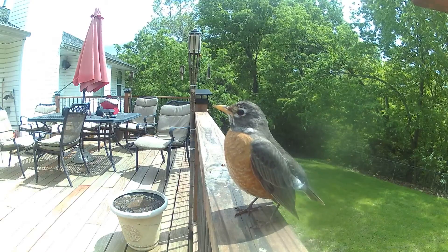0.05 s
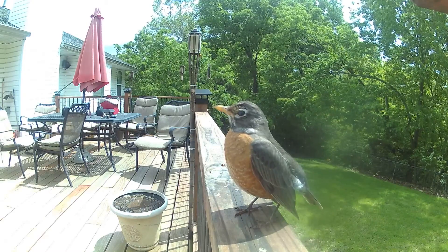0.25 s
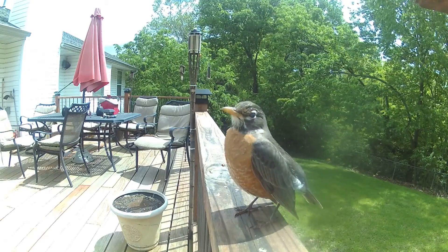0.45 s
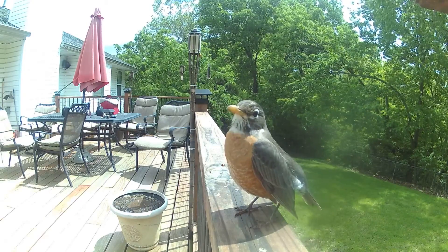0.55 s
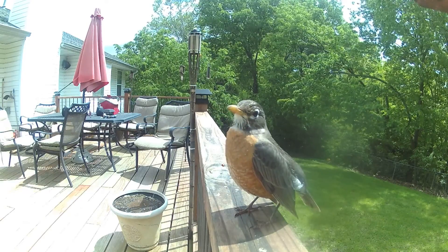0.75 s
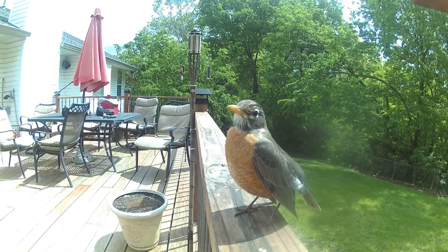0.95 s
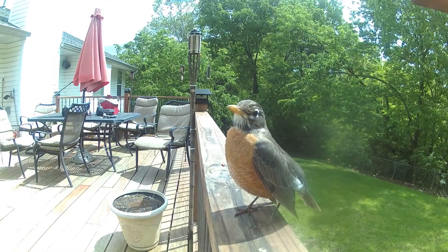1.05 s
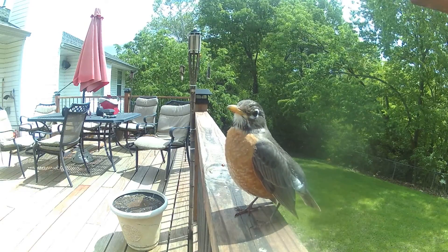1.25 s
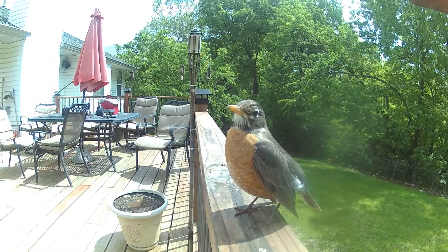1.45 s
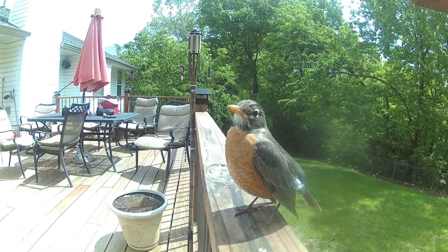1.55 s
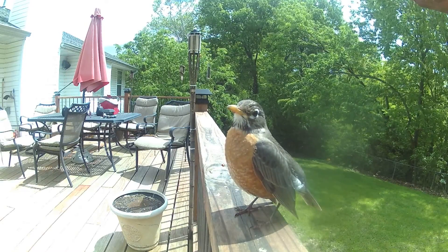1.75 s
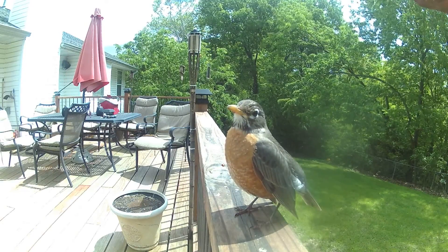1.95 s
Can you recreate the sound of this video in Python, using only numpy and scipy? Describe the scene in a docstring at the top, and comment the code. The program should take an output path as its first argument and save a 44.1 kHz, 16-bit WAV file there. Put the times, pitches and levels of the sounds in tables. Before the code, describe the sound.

Three quick, mellow robin chucks near a small outdoor microphone, with distant hum and soft hiss

```python
"""A deck rail outdoors, where a robin gives three soft chucks close to a small camera.
Both sides of its voice box whistle at once, as swept sines with difference and sum tones, breath and a faint rasp.
Boards and wall scatter short echoes. A distant machine hums as wavering sines, the camera's electronics whine
faintly as fixed sines, and shaped noise gives the leaves, the microphone's hiss and the wind's low rumble on it."""
import sys
import numpy as np
from scipy import signal
from scipy.fft import rfft, irfft
from scipy.io import wavfile
from scipy.ndimage import uniform_filter1d

SR = 44100
rng = np.random.default_rng(int(sys.argv[2]) if len(sys.argv) > 2 else 0)


def unload_audio(sound):
    """Save the sound as a 16-bit wav file, at the path given as the first command line argument."""
    columns = np.transpose(np.atleast_2d(sound))
    # keep every value between -1 and 1, then stretch to whole-number steps
    steps = np.round(np.clip(columns, -1, 1) * 32767)
    wavfile.write(sys.argv[1], SR, steps.astype(np.int16))


def amplitude_ratio(level_db):
    """Convert a level in decibels to the matching linear amplitude (field) ratio."""
    exponent = np.asarray(level_db, float) / 20
    return 10 ** exponent


N = 88200  # samples, two seconds

FADE_S = 0.002  # note edges, and rounding of the note curves


def smooth(curve):
    """Rounds the corners of a control curve with a running mean."""
    return uniform_filter1d(curve, int(FADE_S * SR))


def band(x, hz, width_hz):
    """Band-pass centred on hz."""
    edges = [hz - width_hz / 2, hz + width_hz / 2]
    return signal.sosfilt(signal.butter(2, edges, "band", fs=SR, output="sos"), x)


def walk(rate_hz):
    """Slow random wander with a spread near 1: held random levels, slewed twice."""
    hold = int(SR / rate_hz)
    steps = np.repeat(rng.standard_normal(N // hold + 2), hold)
    return 1.37 * uniform_filter1d(uniform_filter1d(steps, hold), hold)[:N]


def colour(points):
    """Noise of rms 1 whose spectrum runs through (Hz, dB) points on a log frequency axis."""
    points = np.array(points)
    hz = np.maximum(np.arange(N // 2 + 1) * SR / N, 1)
    gain_db = np.interp(np.log(hz), np.log(points[:, 0]), points[:, 1])
    noise = irfft(rfft(rng.standard_normal(N)) * amplitude_ratio(gain_db), N)
    return noise / np.std(noise)


def voice(notes, t, level_column=2):
    """Phase and amplitude of one side of the voice box, gliding through its notes and shut between them."""
    rows = np.concatenate([np.array(note) for note in notes])
    gate = sum(np.clip(np.minimum(t - note[0][0], note[-1][0] - t) / FADE_S, 0, 1) for note in notes)
    pitch_hz = smooth(np.interp(t, rows[:, 0], rows[:, 1]))
    level_db = smooth(np.interp(t, rows[:, 0], rows[:, level_column]))
    return 2 * np.pi * np.cumsum(pitch_hz) / SR, np.sqrt(2) * gate * amplitude_ratio(level_db)


# Upper side of the voice box, one list per note. Each row: time in seconds, pitch in Hz, level in dB.
UPPER_NOTES = [
    [(0.236, 1998, -72.6), (0.24, 2416, -48.3), (0.245, 2822, -47.8), (0.25, 2960, -47.4),
     (0.255, 2948, -46.5), (0.26, 2871, -45.4), (0.265, 2777, -44.2), (0.27, 2698, -44.6),
     (0.275, 2536, -45.7), (0.28, 2079, -37.5), (0.285, 1749, -35.2), (0.29, 1524, -35.5),
     (0.295, 1361, -33.3), (0.3, 1354, -35.3), (0.305, 1390, -42.6), (0.31, 1345, -70.9)],
    [(0.478, 2202, -73.5), (0.481, 2414, -53.8), (0.485, 2745, -47.8), (0.49, 3035, -48.4),
     (0.495, 3064, -48.1), (0.5, 2958, -46.4), (0.505, 2823, -44.1), (0.51, 2657, -42.9),
     (0.515, 2578, -41.9), (0.52, 2270, -42.0), (0.525, 1982, -41.6), (0.53, 1653, -37.1),
     (0.535, 1483, -35.3), (0.54, 1386, -34.4), (0.546, 1489, -38.8), (0.55, 1339, -48.3),
     (0.554, 1438, -72.2)],
    [(0.708, 2090, -72.6), (0.711, 2282, -54.0), (0.715, 2718, -49.7), (0.72, 3110, -51.6),
     (0.725, 3212, -51.7), (0.735, 3192, -52.1), (0.745, 3065, -48.3), (0.75, 3026, -47.5),
     (0.756, 3115, -49.5), (0.76, 3028, -46.3), (0.765, 2843, -43.0), (0.77, 2524, -40.1),
     (0.775, 2250, -45.9), (0.779, 2010, -69.7)],
    [(0.788, 1966, -68.9), (0.791, 1769, -49.0), (0.794, 1538, -43.3), (0.797, 1439, -40.5),
     (0.801, 1479, -43.6), (0.805, 1445, -49.5), (0.809, 1443, -58.7)],
]
# Lower side, one list per note. Each row: time in seconds, pitch in Hz, level in dB,
# level of the difference tone in dB.
LOWER_NOTES = [
    [(0.237, 1164, -56.6, -59.7), (0.24, 1512, -43.9, -51.7), (0.244, 1762, -40.5, -46.9),
     (0.25, 1740, -36.8, -41.8), (0.255, 1704, -35.7, -41.6), (0.26, 1643, -35.4, -43.3),
     (0.265, 1581, -35.3, -40.8), (0.27, 1493, -31.1, -38.5), (0.275, 1294, -27.3, -38),
     (0.278, 1191, -31.0, -38), (0.281, 1169, -38.5, -47.9), (0.285, 1273, -48.5, -76.6)],
    [(0.478, 1184, -59.8, -66.9), (0.481, 1545, -44.2, -60.4), (0.485, 1778, -39.9, -47.2),
     (0.49, 1855, -37.2, -43.4), (0.495, 1830, -34.7, -41.5), (0.505, 1731, -33.0, -40.3),
     (0.515, 1566, -31.6, -44.1), (0.52, 1476, -28.3, -48.4), (0.525, 1330, -25.6, -60.0),
     (0.528, 1220, -28.8, -63.9), (0.531, 1061, -41.2, -71.5), (0.534, 860, -49.4, -68.2)],
    [(0.711, 1797, -72.0, -79.1), (0.715, 1932, -45.5, -55.2), (0.72, 2064, -40.2, -44.8),
     (0.725, 2043, -37.5, -44.6), (0.73, 1982, -34.9, -46.1), (0.735, 1925, -34.4, -44.5),
     (0.745, 1891, -35.2, -43.3), (0.75, 1861, -35.8, -40.7), (0.753, 1796, -38.5, -40.8),
     (0.756, 1549, -41.9, -41.1), (0.76, 1402, -61.8, -70.5)],
]


def both_voices(t):
    """Phase and amplitude of the two whistles, and the amplitude of their difference tone."""
    upper_phase, upper_amp = voice(UPPER_NOTES, t)
    lower_phase, lower_amp = voice(LOWER_NOTES, t)
    difference_amp = voice(LOWER_NOTES, t, level_column=3)[1]
    return upper_phase, upper_amp, lower_phase, lower_amp, difference_amp


# Weaker mixing tones. Each row: multiple of the upper pitch, multiple of the lower pitch, level in dB
# relative to the lower voice (to the upper voice where the lower multiple is 0).
MIXING_TONES = [(0, 2, -27), (1, 1, -31), (2, 0, -29)]


def mixing_tones(upper_phase, upper_amp, lower_phase, lower_amp):
    """Sum tone and octaves of the two whistles, present while the upper sounds, low-passed by the throat."""
    mixes = 0
    for upper_n, lower_n, db in MIXING_TONES:
        carrier = lower_amp if round(lower_n) else upper_amp
        phase = round(upper_n) * upper_phase + round(lower_n) * lower_phase
        mixes = mixes + amplitude_ratio(db) * carrier * (upper_amp > 0) * np.sin(phase)
    throat = signal.butter(8, 3950, fs=SR, output="sos")  # cutoff in Hz
    return signal.sosfiltfilt(throat, mixes)


RASP_HZ = 12300  # centre of the high rasp
# Puffs of breath noise. Each row: start in seconds, length in seconds,
# peak level in dB of the white noise ahead of the bands and their gain.
BREATH_PUFFS = [(.258, .025, -78), (.494, .036, -72)]


def breath(t):
    """High breath noise: half-sine puffs of white noise through a wide and a narrow band."""
    puff = sum(amplitude_ratio(db) * np.sin(np.pi * np.clip((t - start) / length, 0, 1))
               for start, length, db in BREATH_PUFFS)
    air = puff * rng.standard_normal(N)
    return 2 * band(air, RASP_HZ - 1500, 5000) + 2 * band(air, RASP_HZ, 1500)


def rasp_overtone(upper_phase, lower_phase, lower_amp, difference_amp):
    """Faint high overtone while both voices are coupled: the upper pitch plus five times the lower."""
    tone = lower_amp * difference_amp * np.sin(upper_phase + 5 * lower_phase)
    return amplitude_ratio(-3) * band(tone, RASP_HZ, 900)


def robin(t):
    """Two whistles at once, their difference and sum tones, breath noise and a faint high rasp."""
    upper_phase, upper_amp, lower_phase, lower_amp, difference_amp = both_voices(t)
    whistles = upper_amp * np.sin(upper_phase) + lower_amp * np.sin(lower_phase)
    difference = difference_amp * np.sin(upper_phase - lower_phase)
    mixes = mixing_tones(upper_phase, upper_amp, lower_phase, lower_amp)
    rasp = rasp_overtone(upper_phase, lower_phase, lower_amp, difference_amp)
    return whistles + difference + mixes + breath(t) + rasp


def deck_echo(x):
    """Boards and wall scatter the sound: a decaying noise tail of unit energy, mixed in quietly."""
    echo_db, t60_s, first_echo_s = -25, 0.1, 0.003
    t = np.arange(SR // 4) / SR
    tail = rng.standard_normal(len(t)) * amplitude_ratio(-60 * t / t60_s) * (t > first_echo_s)
    tail = tail / np.sqrt(np.sum(tail ** 2))
    return x + amplitude_ratio(echo_db) * signal.fftconvolve(x, tail)[:N]


# Motor tones. Each row: multiple of the blade rate, multiple of the shaft rate, mid level in dB.
MOTOR_TONES = [(0, 5, -60.5), (1, 1, -65), (2, -1, -59.5), (2, 0, -52), (2, 1, -66), (2, 2, -72.5),
               (3, 0, -69), (3, 1, -70.5), (4, -1, -72), (4, 0, -79.5), (4, 1, -66), (5, -1, -69),
               (5, 0, -62.5), (6, -1, -72), (6, 0, -75.5), (7, -2, -79), (7, -1, -80), (7, 1, -67),
               (8, 1, -76), (9, -1, -79), (9, 1, -85.5), (10, -1, -77.5), (10, 1, -86.5), (11, -1, -77),
               (11, 0, -82), (11, 1, -77.5), (12, 0, -88)]
# Hums unrelated to those rates. Each row: mid frequency in Hz, mid level in dB.
OTHER_HUMS = [(422, -72), (447.6, -65), (469.9, -62), (626.6, -73), (1096.6, -75)]


def machine():
    """Steady motor hum: sines at blade and shaft combinations, each wavering a little in pitch and level."""
    blade_hz, shaft_hz = 249.0, 57.9
    waver_db, drift_hz, waver_rate_hz = 1.2, 0.8, 7.0
    tones = [(round(blade) * blade_hz + round(shaft) * shaft_hz, db) for blade, shaft, db in MOTOR_TONES]
    hum = np.zeros(N)
    for hz, db in tones + list(OTHER_HUMS):
        level = np.sqrt(2) * amplitude_ratio(db + waver_db * walk(waver_rate_hz))
        cycles = np.cumsum(hz + drift_hz * walk(waver_rate_hz)) / SR + rng.random()
        hum += level * np.sin(2 * np.pi * cycles)
    return hum


# Whine of the camera's electronics. Each row: frequency in Hz, level in dB.
WHINE_TONES = [(13001, -99), (13081, -91), (13162, -91), (13243, -100)]


def whine(t):
    """Thin fixed sines from the camera's electronics, each at a random starting phase."""
    return sum(np.sqrt(2) * amplitude_ratio(db) * np.sin(2 * np.pi * (hz * t + rng.random())) for hz, db in WHINE_TONES)


# Spectrum of the leaves. Each row: frequency in Hz, relative density in dB per Hz.
LEAF_SPECTRUM = [(12, -58), (20, -5.5), (237, -11), (293, -15), (380, -13), (492, -10.5), (596, -15),
                 (1240, -16), (1350, -17), (1820, -22), (2170, -27), (2740, -28), (3400, -37), (4420, -75),
                 (7480, -120)]


def leaves():
    """Distant foliage: shaped noise, nearly smooth, its level flickering slightly."""
    level_db, flicker_db, flicker_rate_hz = -52, 0.5, 3.49
    return colour(LEAF_SPECTRUM) * amplitude_ratio(level_db + flicker_db * walk(flicker_rate_hz))


# Spectrum of the microphone's hiss. Each row: frequency in Hz, relative density in dB per Hz.
HISS_SPECTRUM = [(1760, -27), (3000, -2.5), (3400, -8.5), (3660, -1.5), (4500, -0.5), (5390, -8.5),
                 (6270, -5), (7500, -12), (9280, -15), (10400, -14), (12400, -16.5), (14000, -14.5),
                 (15600, -17.5)]


def microphone_hiss():
    """Steady shaped noise of the microphone."""
    return colour(HISS_SPECTRUM) * amplitude_ratio(-67.5)


# Spectrum of the rumble. Each row: frequency in Hz, relative density in dB per Hz.
WIND_SPECTRUM = [(8, -30), (14, 0), (35, 0), (60, -3), (85, -9), (110, -25), (200, -70)]
# Course of the gust. Each row: time in seconds, level in dB.
GUST_LEVELS = [(0, -60), (.12, -63), (.3, -60), (.45, -64), (.64, -66), (.7, -50), (.8, -49), (.86, -54),
               (.93, -50), (.99, -57), (1.1, -59), (1.3, -60), (1.6, -63), (2, -68)]


def wind(t):
    """Low rumble on the microphone: shaped noise whose level follows the gust."""
    gust = np.array(GUST_LEVELS)
    return colour(WIND_SPECTRUM) * amplitude_ratio(np.interp(t, gust[:, 0], gust[:, 1]))


def scene():
    """The robin with its deck echoes, over the hum, whine, leaves, hiss and wind, in one channel."""
    t = np.arange(N) / SR
    bird = deck_echo(robin(t))
    background = machine() + whine(t) + leaves() + microphone_hiss() + wind(t)
    return (bird + background)[None]


def roll_off(x):
    """The treble ends steeply here."""
    return signal.sosfilt(signal.butter(12, 15700, fs=SR, output="sos"), x)


def record(dry):
    """The camera takes in the scene at its own level."""
    return roll_off(dry)


dry = scene()
out = record(dry)
unload_audio(out)
```